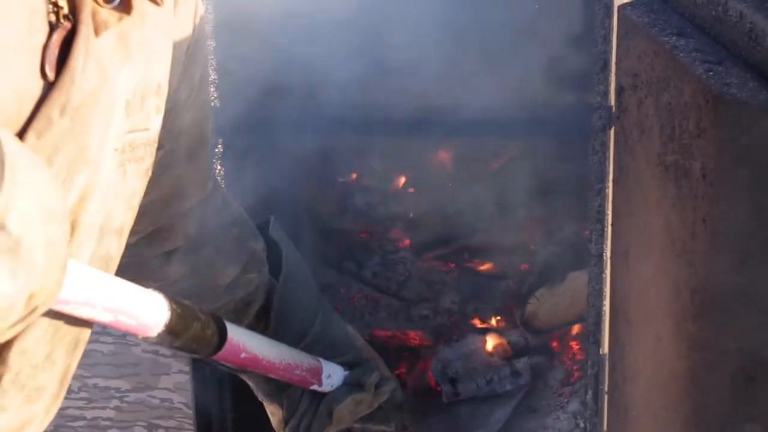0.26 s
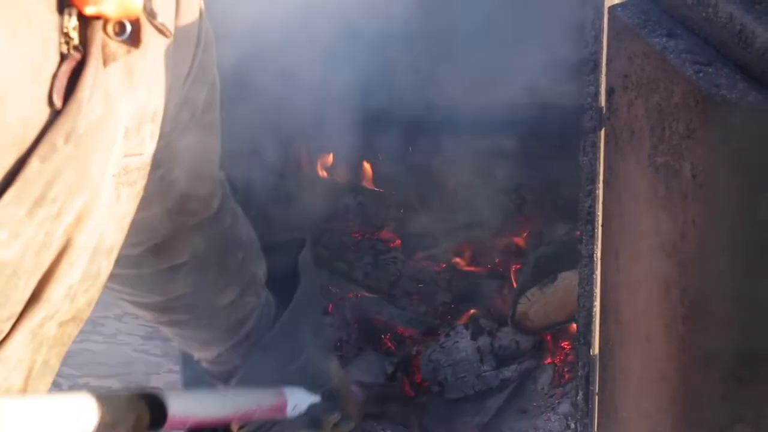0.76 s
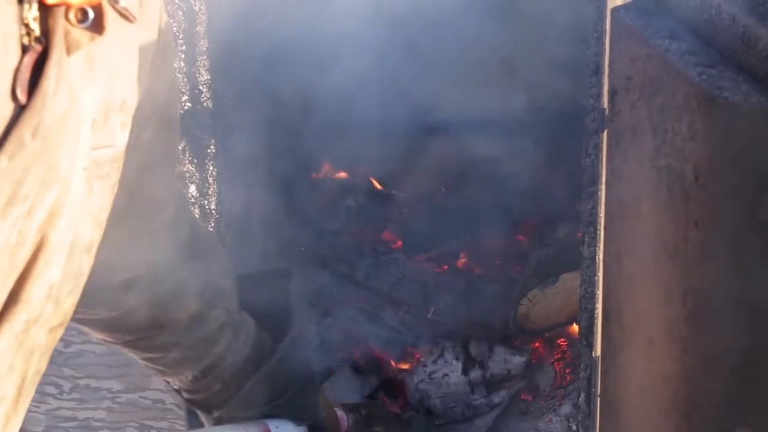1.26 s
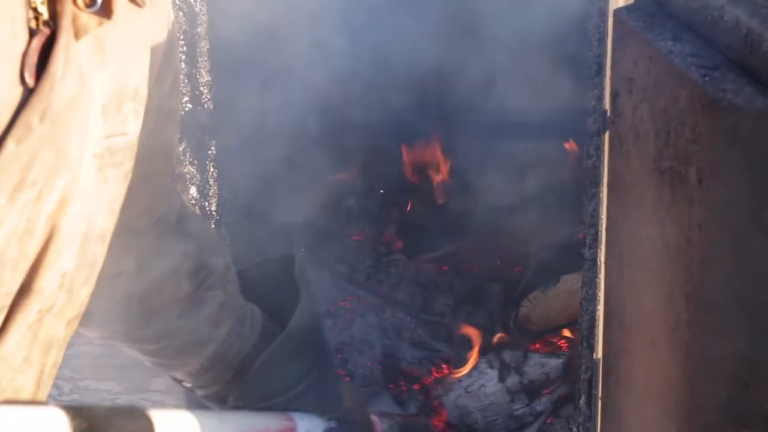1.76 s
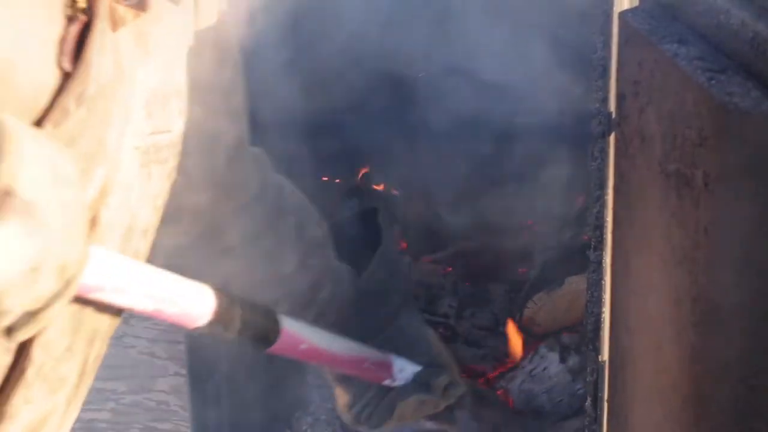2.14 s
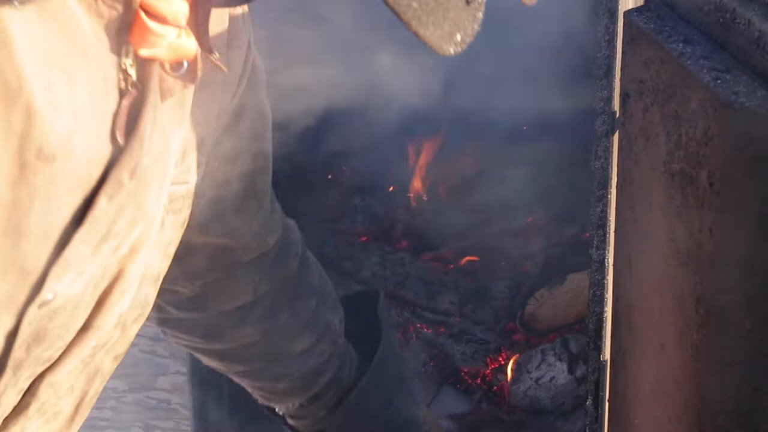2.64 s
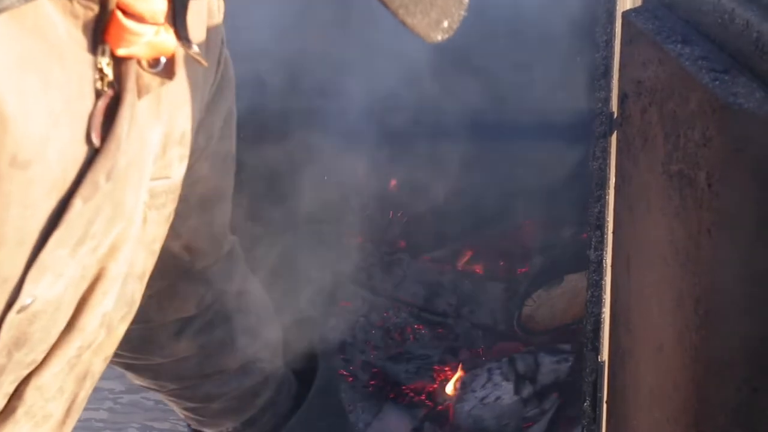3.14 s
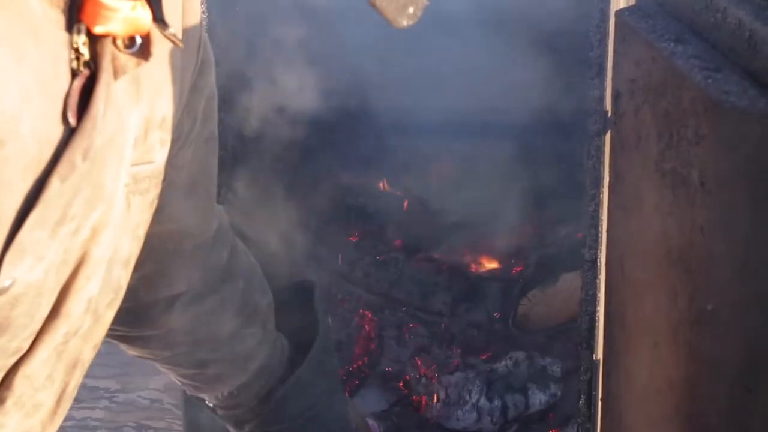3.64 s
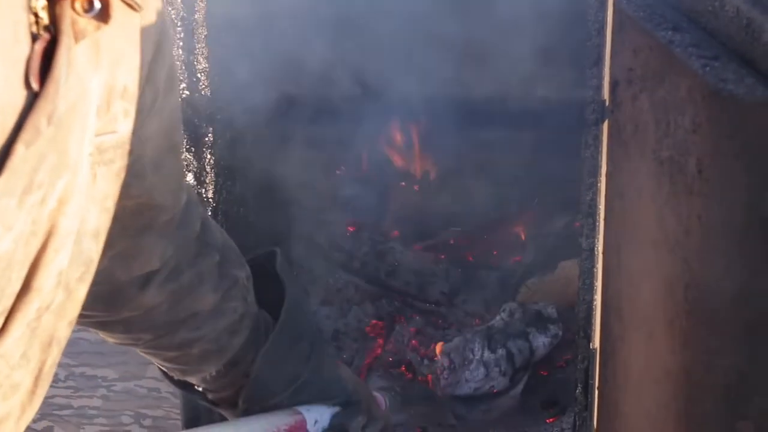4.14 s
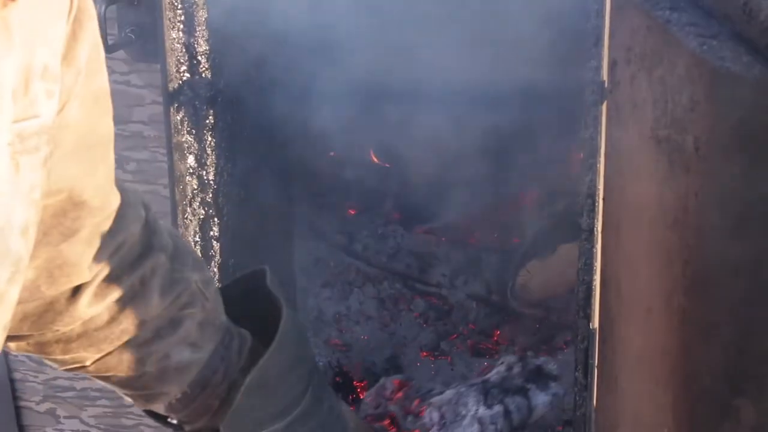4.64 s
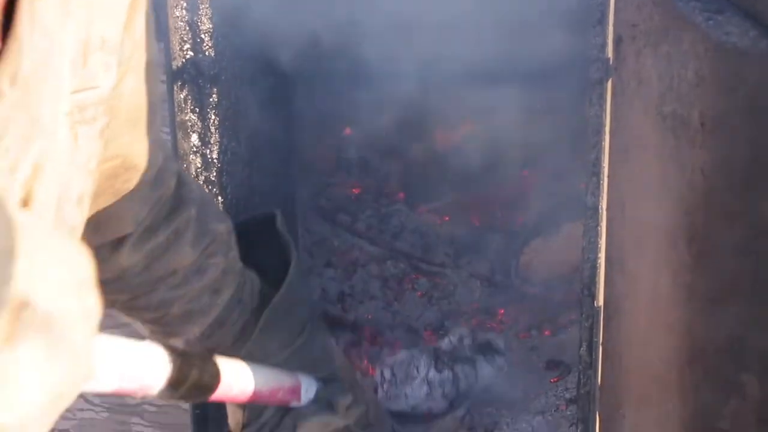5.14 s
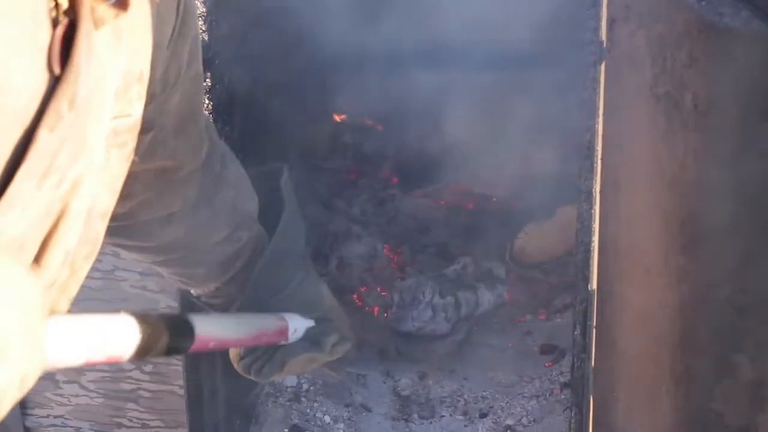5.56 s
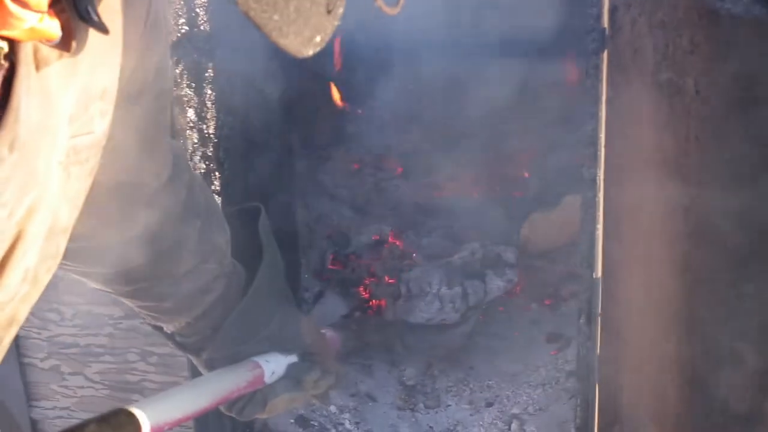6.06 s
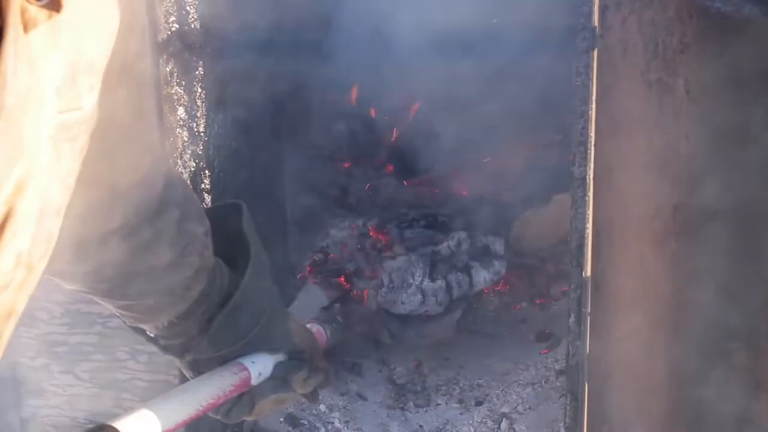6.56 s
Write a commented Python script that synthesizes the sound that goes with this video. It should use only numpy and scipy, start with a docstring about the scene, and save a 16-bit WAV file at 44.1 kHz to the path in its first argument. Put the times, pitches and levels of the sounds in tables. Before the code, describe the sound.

A metal scoop scrapes and knocks through coals and ash in an outdoor stove firebox, with sharp ember pops over low flame flutter.

```python
"""A steel scoop scrapes through coals and ash in the firebox of an outdoor wood stove and knocks against lumps.
Friction noise and blows drive the scoop's resonances; ash blurs them, and short rough tones stand out.
Flames flutter low as modulated noise and puffs; a mains hum (one sine) stands under a faint noise hiss.
The bed ticks faintly, embers pop, mostly as sharp pressure cycles, and the iron box answers with a short noise tail."""
import sys
import numpy as np
from scipy import signal
from scipy.fft import rfft, irfft, next_fast_len
from scipy.io import wavfile
from scipy.ndimage import uniform_filter1d, map_coordinates

SR = 44100
rng = np.random.default_rng(int(sys.argv[2]) if len(sys.argv) > 2 else 0)


def log_audio(samples):
    """Write samples as a 16-bit WAV file to the path given in sys.argv[1]."""
    # one column per channel
    frames = np.atleast_2d(samples).T
    # limit to full scale, then quantise
    limited = np.clip(frames, -1, 1)
    pcm = np.round(limited * 32767).astype(np.int16)
    wavfile.write(sys.argv[1], SR, pcm)


N = 300321


def amp(db):
    """Gain of a dB value."""
    return 10 ** (np.asarray(db) / 20)


def unit(x):
    """Scales to rms 1."""
    return x / np.sqrt(np.mean(x ** 2) + 1e-20)


def along(points, hz):
    """Interpolates (Hz, value) points on a log frequency axis."""
    point_hz, values = np.transpose(points)
    return np.interp(np.log(hz + 1), np.log(point_hz + 1), values)


def wobble(knots_per_s):
    """Smooth random curve through normally distributed knots."""
    knots = rng.standard_normal(int(N * knots_per_s / SR) + 4)
    return map_coordinates(knots, [np.arange(N) * knots_per_s / SR])


def filtered(x, response):
    """Multiplies the spectrum of x by a complex response of frequency."""
    size = next_fast_len(N + SR // 2)
    spectrum = rfft(x, size) * response(np.fft.rfftfreq(size, 1 / SR))
    return irfft(spectrum, size)[..., :N]


def peak(f, hz, width_hz):
    """Response of one causal resonance."""
    return 1j * f * width_hz / (hz * hz - f * f + 1j * f * width_hz)


def add(track, start_s, sound):
    """Mixes a short sound into the track."""
    part = track[..., round(start_s * SR):][..., :sound.shape[-1]]
    part += sound[..., :part.shape[-1]]


# Left-right likeness of background noise. Each row: frequency in Hz, correlation from 0 to 1.
LIKENESS = [(60, 0.885), (240, 0.982), (950, 0.816), (3770, 0.304), (15000, 0.092)]
LEFT_LEAD_S, LEFT_OVER_RIGHT_DB = .0001, 1.5


def background_noise(spectrum):
    """Stereo noise of rms 1, less alike in the treble; the left channel is earlier and louder."""
    def mid_side(hz):
        angle = np.arccos(np.clip(along(LIKENESS, hz), -1, 1)) / 2
        return amp(along(spectrum, hz)) * [np.cos(angle), np.sin(angle)]

    def lead(hz):
        gain = amp([[LEFT_OVER_RIGHT_DB / 2], [-LEFT_OVER_RIGHT_DB / 2]])
        return gain * np.exp(1j * np.pi * LEFT_LEAD_S * np.outer([1, -1], hz))

    mid, side = filtered(rng.standard_normal((2, N)), mid_side)
    return unit(filtered(np.array([mid + side, mid - side]), lead))


# Shoves of the scoop. Each row: start in seconds, length before lift-off in seconds, edge drive in dB,
# lumps relative to edge in dB, ash relative to edge in dB, level change by the end in dB.
SHOVES = [(-0.03, 0.2816, -41.5, -4, -1.5, 1), (0.147, 0.039, -35.5, -7.5, 0, -1.5),
          (0.274, 0.068, -36, -0.5, 1, -9), (0.37, 0.1725, -40.5, -9.5, -5.5, -1),
          (0.546, 0.1291, -44, -1, -0.5, -2), (0.731, 0.0293, -54.5, 1, -1.5, 1),
          (0.795, 0.25, -46.5, -5, 0.5, -25.5), (1.256, 0.1296, -62.5, -4, -2, 1),
          (1.992, 0.2177, -53, 1, -0.5, 7), (2.212, 0.2694, -54.5, -4, -3.5, -6),
          (2.577, 0.135, -58, 0.5, -2.5, -2), (3.061, 0.1114, -41.5, -7.5, -1.5, -17.5),
          (3.442, 0.0448, -43.5, -2, -6.5, -9.5), (4.262, 0.138, -72.5, 8.5, 7.5, 2),
          (4.953, 0.1976, -61.5, 1.5, -7.5, -1), (5.163, 0.078, -59, 2, -1, 2.5),
          (5.237, 0.188, -47, -4.5, -11.5, -5), (5.416, 0.085, -53, -1.5, -15, 4),
          (5.493, 0.3324, -45.5, -1, -6.5, -26.5), (5.708, 0.2446, -51.5, -3, -6, -15.5),
          (6.531, 0.0975, -62.5, -1.5, -2, -7)]
BITE_S, LIFT_S = 0.0346, 0.0368  # the edge digs in, and comes away


def strokes():
    """Gains of edge, lumps and ash: each shove digs in, drifts in level and lifts off; shoves add in power."""
    t, power = np.arange(N) / SR, np.zeros((3, N))
    for start_s, length_s, edge_db, lumps_db, ash_db, change_db in SHOVES:
        bite = np.clip((t - start_s) / BITE_S, 0, 1)
        lift = np.clip(1 + (start_s + length_s - t) / LIFT_S, 0, 1)
        drift_db = change_db * np.clip((t - start_s) / length_s, 0, 1)
        gain = bite * lift * amp(edge_db + drift_db)
        power += (amp([[0], [lumps_db], [ash_db]]) * gain) ** 2
    return np.sqrt(power)


def grit(clumps_per_s, rough_db):
    """Friction: dense tiny slips in clumps; shifting coals damp now one, now another part of the blade."""
    clumping_db = rough_db * wobble(clumps_per_s) + 1.658 * rough_db * wobble(clumps_per_s / 7)
    slips = rng.standard_normal(N) * amp(clumping_db)
    z = signal.stft(slips, nperseg=512)[2]
    damping = uniform_filter1d(rng.standard_normal(z.shape), size=3, axis=0)
    damping = uniform_filter1d(damping, size=9, axis=1)
    return unit(signal.istft(z * amp(2.22 * unit(damping)), nperseg=512)[1][:N])


# Resonances of the bare scoop. Each row: frequency in Hz, width in Hz, level in dB.
BLADE = [(1004.2, 42.7, -15), (1262, 11.7, -2.5), (1440.4, 37.4, -8.5), (1925, 30, -2.5), (2449, 69, -17),
         (2909, 41, -5.5), (3825, 198, -16), (5244, 33, -9.5), (6163, 31, -21), (7485, 56, -12.5),
         (8815, 18, -15.5), (10080, 27, -11)]
# Broad colour of coal on steel. Each row: frequency in Hz, relative density in dB per Hz.
RUBBING = [(180, -41), (300, 10), (1430, 10), (2480, 9.5), (3470, 4.5), (7500, 6), (14200, 2.5),
           (15700, -13)]


def blade(f, wider=1):
    """One row per resonance, last the broad response; ash widens the modes and raises the broad part."""
    modes = []
    for k, (hz, width_hz, db) in enumerate(BLADE):
        mode = (-1) ** k * amp(db) * peak(f, hz, wider * width_hz)
        modes.append(mode / np.sqrt(wider))
    broad = amp(along(RUBBING, f) - along(RUBBING, 2500) - 17)
    return np.array(modes + [broad * np.sqrt(wider)])


SHIFTING_DB, SHIFTS_PER_S = 4, 14


def ringing(drive):
    """Bare blade; each resonance swells and dies as the load moves."""
    *modes, broad = filtered(drive, blade)
    return broad + sum(unit(amp(SHIFTING_DB * wobble(SHIFTS_PER_S))) * mode for mode in modes)


# Friction of edge, lumps and ash, in that order.
# Each row: clumps per second, roughness in dB, centre in Hz, span in Hz.
GRIT = [(380.6, 1.35, 2538, 3760), (248.3, 0.7, 842.4, 1516), (696.4, 2, 7450, 14600)]


def scraping():
    """Friction force on the blade, each kind scaled by how loudly the bare blade answers it."""
    f = np.fft.rfftfreq(SR // 16, 1 / SR)
    drive = np.zeros(N)
    for gain, (clumps_per_s, rough_db, centre_hz, span_hz) in zip(strokes(), GRIT):
        answer = blade(f).sum(0) * peak(f, centre_hz, span_hz) ** 2
        loudness = np.sqrt(np.mean(np.abs(answer) ** 2))
        friction = filtered(grit(clumps_per_s, rough_db), lambda g: peak(g, centre_hz, span_hz) ** 2)
        drive += gain / loudness * friction
    return drive


# Spells with the blade in ash. Each row: start in seconds, end in seconds.
BURIED = [(2.24, 2.75), (3.3, 6.81)]
BURIED_WIDER = 5  # factor on resonance width


def scoop():
    """Slips and blows sound through one blade, bare or buried; the direct blows and rough tones are added."""
    blows = noise_blows()
    drive = scraping() + blows
    t = np.arange(N) / SR
    buried = sum((t > start_s) & (t < end_s) for start_s, end_s in BURIED)
    bare_steel = ringing(drive * (1 - buried))
    buried_steel = filtered(drive * buried, lambda f: blade(f, BURIED_WIDER).sum(0))
    return bare_steel + buried_steel + amp(-13) * blows + rough_tones()


def crackle(count=260):
    """Faint ticks from the glowing bed: random impulses through a treble resonance."""
    start, size, side = rng.random((count, 3)).T
    level_db = -48 - 3 * np.log(size)
    out = np.zeros((2, N))
    ticks = amp(level_db) * amp([5 * side, -5 * side])
    np.add.at(out, (slice(None), (start * N).astype(int)), ticks)
    return filtered(out, lambda f: peak(f, 5100, 4700) ** 2)


# Decay of the iron box. Each row: frequency in Hz, time to fall 60 dB in seconds.
FIREBOX_T60 = [(300, 0.152), (2000, 0.0833), (6000, 0.0505), (14000, 0.0157)]


def firebox(x):
    """Short noise tail, drawn anew every 0.3 s, each frequency dying at its own speed."""
    out, step = np.zeros((2, N)), int(.3 * SR)
    for start in range(0, N, step):
        hz, t, z = signal.stft(rng.standard_normal((3, SR // 5)), SR, nperseg=128)
        decay = amp(-60 * t / along(FIREBOX_T60, hz)[:, None])
        tails = signal.istft(z * decay, SR, nperseg=128)[1]
        tail = tails[0] + 0.04 * tails[1:]  # nearly alike left and right
        tail = tail / np.linalg.norm(tail[0])
        answer = signal.fftconvolve(x[None, start:start + step], tail, axes=1)
        add(out, start / SR + .003, answer)
    return out


# Flutter level before surges. Each row: time in seconds, level in dB.
FLAMES = [(0.0, -57), (0.6, -57.5), (1.2, -57.5), (1.5, -57), (2.1, -54.5), (2.7, -60.5), (3.45, -52.5),
          (3.65, -57.5), (3.9, -53), (4.2, -62.5), (4.8, -53), (5.1, -63.5), (5.7, -55.5), (6.0, -59)]
# Strongest puffs. Each row: time in seconds, pulse gain in dB.
PUFFS = [(1.552, -38), (1.613, -37), (1.937, -34.5), (2.336, -36), (4.299, -39.5), (4.44, -41.5),
         (4.564, -43), (4.857, -38), (5.502, -35), (6.118, -40), (6.164, -40), (6.421, -41.5)]
# Flutter spectrum. Each row: frequency in Hz, relative density in dB per Hz.
FLUTTER = [(12, -62.5), (20, -5), (54, -25), (167, -6.5), (261, -2.5), (1200, -16), (1560, -43),
           (2640, -120)]
PUFF_S = 0.000929  # time scale of one pulse


def flames(count=240):
    """Low turbulent flutter, and puffs of gas that each push the air once."""
    seconds, db = np.transpose(FLAMES)
    level_db = np.interp(np.arange(N) / SR, seconds, db)
    surge_db = 1.1 * wobble(9)
    turbulence = unit(amp(4.19 * wobble(60)) * background_noise(FLUTTER))
    flutter = amp(level_db + surge_db) * turbulence
    pushes = np.zeros(N)
    at, size = rng.random((count, 2)).T
    at = (at * N).astype(int)
    np.add.at(pushes, at, amp(level_db[at] + 5 - 1.8 * np.log(size)))
    for start_s, puff_db in PUFFS:
        pushes[round(start_s * SR)] += amp(puff_db)
    u = np.arange(SR // 40) / SR / PUFF_S
    pulse = np.e * u * (2 - u) * np.exp(-u)
    puffs = np.convolve(pushes, pulse)[:N]
    return flutter + filtered(puffs, lambda f: (1j * f / (110 + 1j * f)) ** 2)  # no deep bass from a small flame


HUM_HZ, HUM_DB = 240.2, -58.5


def hum():
    """A mains overtone: one sine, slightly unsteady in phase and level."""
    phase = 2 * np.pi * HUM_HZ * np.arange(N) / SR + .5 * wobble(3.17)
    return amp(HUM_DB + 0.31 * wobble(9.8)) * np.sin(phase)


# Hiss spectrum. Each row: frequency in Hz, relative density in dB per Hz.
HISS = [(180, -19.5), (300, -21), (900, -10.5), (3400, -13), (9240, -17.5), (14200, -22.5), (16000, -30)]
HISS_DB = -57.5


def hiss():
    """Faint stereo noise with a slowly wavering level."""
    return amp(HISS_DB + 1.35 * wobble(2.994)) * background_noise(HISS)


# Short rough tones: mostly the edge catching; the one at 3.6415 s is the brief ring of an ember pop.
# Each row: start in seconds, length in seconds, frequency in Hz, level in dB.
ROUGH_TONES = [(0.103, 0.045, 1891, -36), (0.306, 0.061, 2454, -39.5), (2.046, 0.103, 1435, -51),
               (2.111, 0.1056, 1036, -47), (2.628, 0.084, 500, -52.5), (3.078, 0.092, 7490, -53),
               (3.6415, 0.0034, 1750, -38.5), (5.015, 0.08, 762.6, -47.5), (5.186, 0.046, 922, -48.5),
               (5.285, 0.093, 957, -45.5), (5.332, 0.068, 2524, -48.5)]
TONE_WIDTH_HZ = 96


def rough_tones():
    """Narrow-band noise stands out for a moment: mostly the edge catching on the iron, once an ember's ring."""
    out, t = np.zeros(N), np.arange(SR // 4) / SR
    f = np.fft.rfftfreq(len(t), 1 / SR)
    for start_s, length_s, hz, db in ROUGH_TONES:
        noise = rfft(rng.standard_normal(len(t)))
        tone = unit(irfft(noise * peak(f, hz, TONE_WIDTH_HZ) ** 2, len(t)))
        envelope = np.sqrt(np.abs(np.sin(np.pi * np.clip(t / length_s, 0, 1))))
        add(out, start_s, amp(db) * tone * envelope)
    return out


# Short noise-burst blows: lumps knocking the scoop, and at 4.394 s a small ember pop.
# Each row: start in seconds, peak force in dB, loudest region in Hz, decay in seconds (held to at least 1 ms).
BLOWS = [(0.106, -17.5, 1860, 0.014), (0.18, -15.5, 3620, 0.0067), (0.201, -15.5, 1408, 0.0178),
         (0.275, -17.5, 2670, 0.0056), (0.306, -12, 2500, 0.00595), (0.324, -18.5, 2390, 0.013),
         (0.436, -17, 1496, 0.0124), (0.464, -14.5, 2430, 0.0044), (0.582, -14.5, 2770, 0.00177),
         (0.911, -32, 2560, 0.0048), (0.937, -34, 1060, 0.00213), (2.003, -11.5, 1208, 0.00596),
         (2.028, -25, 5060, 0.0056), (2.082, -24, 5500, 0.0048), (2.197, -22, 7980, 0.0073),
         (2.485, -33.5, 6000, 0.002), (2.612, -25.5, 3820, 0.0064), (3.076, -17, 723, 0.0067),
         (3.093, -22, 7300, 0.004), (3.462, -19, 4900, 0.00496), (3.469, -24, 766, 0.0067),
         (3.518, -30.5, 6100, 0.0033), (3.607, -32.5, 1320, 0.0023), (3.694, -35.5, 1010, 0.00226),
         (4.388, -35, 3560, 0.0021), (4.394, -26, 2000, 0.00168), (5.275, -15, 1248, 0.0101),
         (5.299, -21, 1140, 0.0244), (5.719, -31.5, 1190, 0.0024), (5.752, -29.5, 1010, 0.00233),
         (5.82, -30.5, 946, 0.0025), (5.848, -35.5, 1150, 0.0128), (5.918, -33, 1203, 0.014),
         (6.595, -33, 1396, 0.00645)]


def noise_blows():
    """Lumps knocking the scoop, and one small ember pop: decaying noise through a broad resonance."""
    blows, t = np.zeros(N), np.arange(SR // 16) / SR
    f = np.fft.rfftfreq(len(t), 1 / SR)
    for start_s, db, hz, decay_s in BLOWS:
        envelope = (1 - np.exp(-t / 0.0004)) * np.exp(-t / max(decay_s, .001))
        burst = rng.standard_normal(len(t)) * envelope
        blow = irfft(rfft(burst) * (peak(f, hz, hz) ** 2 + .03), len(t))
        add(blows, start_s, amp(db) * blow / np.abs(blow).max())
    return blows


# Bursting embers. Each row: start in seconds, level in dB, pitch in Hz, treble snap relative to level in dB,
# low push relative to level in dB, left over right in dB.
POPS = [(0.5125, -11, 5800, -29, -27, -4), (1.0734, -27.5, 4340, -1.5, -26, 0),
        (1.1097, -6, 2317, 5.5, -5.5, -2), (1.289, -36, 3800, -20.5, -27.5, -2.5),
        (1.474, -8, 3457, -46, -30, 1.5), (1.8075, -7.5, 3090, 0, -30, 0),
        (2.739, -26, 4760, -24, -30.5, 4), (2.8392, -31.5, 6940, -28, -34, 19),
        (2.9476, -20, 2590, -1, -25, -0.5), (3.0363, 1.5, 3193, -14.5, -25.5, -0.5),
        (3.3273, -19, 2785, -4, -27, 0.5), (3.641, -26, 2160, -2, -20, -1),
        (4.1943, -34, 2190, -2, -28.5, -2.5), (4.6046, -25.5, 5400, -16.5, -38, 1.5),
        (4.963, -31.5, 2970, -22, -30.5, -0.5), (5.097, -20.5, 2890, 1.5, -14, -1.5),
        (5.462, -18, 2110, -32.5, -27.5, 2.5), (6.015, -32.5, 4500, -20, -30, -2)]


def embers():
    """A gas pocket bursts: about one pressure cycle, a snap, brief splinters, a slap off the near wall."""
    out, t = np.zeros((2, N)), np.arange(SR // 80) / SR
    f = np.fft.rfftfreq(len(t), 1 / SR)
    u = t - .0012  # seconds from the middle of the burst
    for start_s, db, hz, snap_db, push_db, pan_db in POPS:
        burst = np.cos(2 * np.pi * hz * u) * np.exp(-(u * hz / 0.447) ** 2)
        bump = np.exp(-(u * hz) ** 2)
        burst -= bump * burst.sum() / bump.sum()  # no net air is left over
        snap_shape = np.exp(-np.abs(u) * np.where(u < 0, 14000, 4500))
        snap = amp(snap_db) * np.sin(2 * np.pi * 7000 * u) * snap_shape
        snap += amp(snap_db - 6.5) * np.cos(2 * np.pi * 12500 * u) * np.exp(-np.abs(u) * 9000)  # its sharp edge
        chips = rng.standard_normal((3, len(t))) * np.exp(-u / 0.001636) * (u > .0002)
        colour = peak(f, hz, 2.2 * hz) ** 3 + amp(snap_db - 9) * peak(f, 11500, 8100) ** 2
        splinters = irfft(rfft(chips[0] + .5 * chips[1:]) * colour, len(t))
        push = amp(push_db) * np.sin(2 * np.pi * 780 * u) * np.exp(-u / 0.00135) * (u > 0)
        pop = burst + snap + push + amp(-9) * splinters
        pop = amp(db) * amp([[pan_db / 2], [-pan_db / 2]]) * pop
        add(out, start_s, pop)
        add(out, start_s + 0.0044, amp(-19) * pop[::-1])  # wall slap, sides swapped
    return filtered(out, lambda f: (1j * f / (350 + 1j * f)) ** 3)  # a tiny burst radiates no bass


# Scattered side signal. Each row: frequency in Hz, level in dB.
SCATTER = [(700, -43), (3000, -15), (5000, -11), (12000, -5)]
SCATTER_S = 0.0011  # decay constant
# Balance of near sounds. Each row: frequency in Hz, left over right in dB.
BALANCE = [(700, 0.86), (3000, 0.5), (7500, 5), (15000, 4.5)]


def stereo_spread(near):
    """Short scattered echoes make the treble differ left to right; a filter tilts the balance."""
    t = np.arange(SR // 100) / SR
    echoes = rng.standard_normal(len(t)) * np.exp(-t / SCATTER_S)
    scattered = signal.fftconvolve(near.mean(0), echoes / np.linalg.norm(echoes))[:N]
    side = filtered(scattered, lambda f: amp(along(SCATTER, f)))
    return filtered(near + [side, -side], lambda f: amp([along(BALANCE, f) / 2, -along(BALANCE, f) / 2]))


def scene():
    """Scoop and embers share the firebox; flames, hum and hiss lie under them."""
    steel = scoop()
    pops = embers() + crackle()
    walls = amp(-16.5) * firebox(pops.mean(0) + amp(2.0) * steel)
    return stereo_spread(steel + pops + walls) + flames() + hum() + hiss()


TOP_HZ = 16800


def record(dry):
    """The microphone drops the deep bass, rounds off the loudest peaks and keeps nothing above its band limit."""
    thin = filtered(dry, lambda hz: 1j * hz / (70 + 1j * hz))
    rounded = thin / (1 + np.abs(thin / .92) ** 6) ** (1 / 6)
    return filtered(rounded, lambda hz: np.clip((TOP_HZ - hz) / 300, 0, 1))


dry = scene()
out = record(dry)
log_audio(out)
```